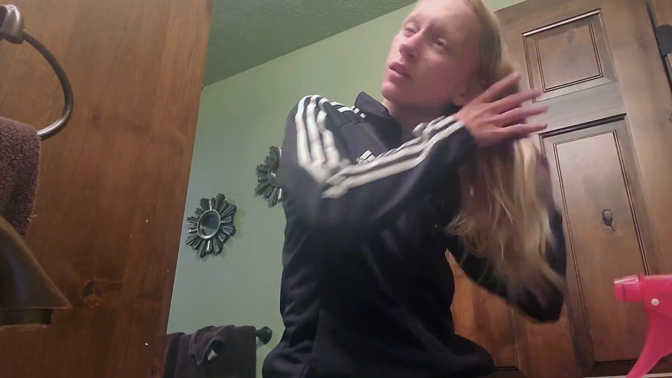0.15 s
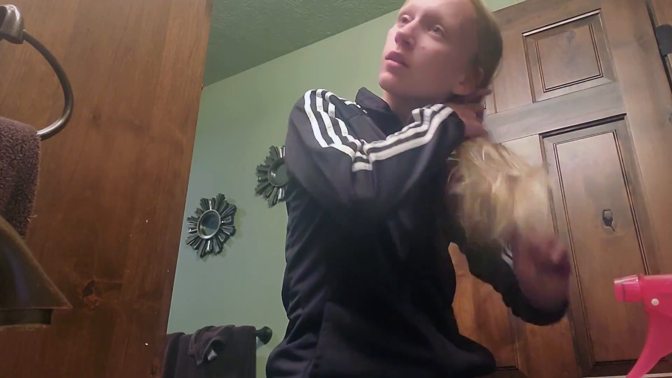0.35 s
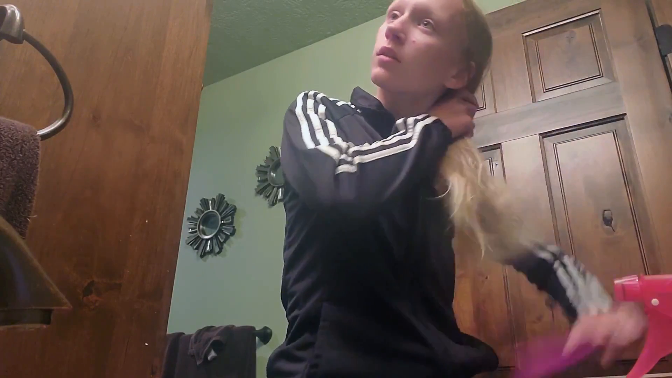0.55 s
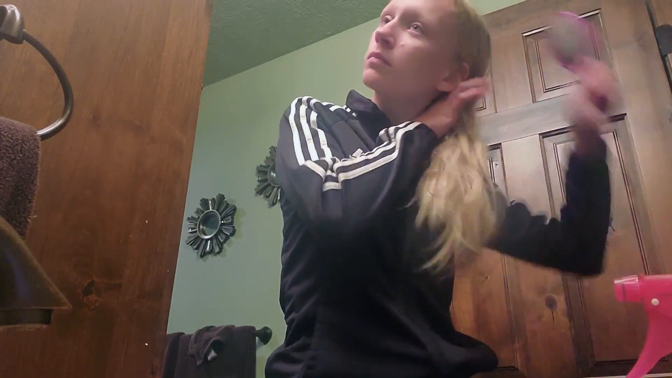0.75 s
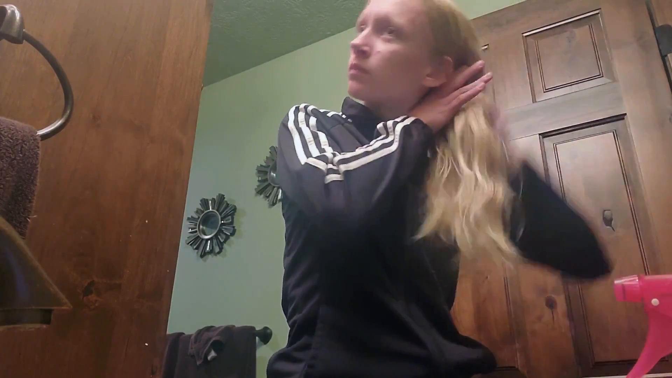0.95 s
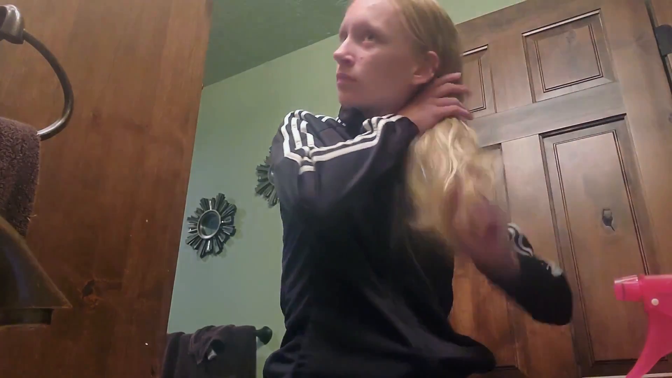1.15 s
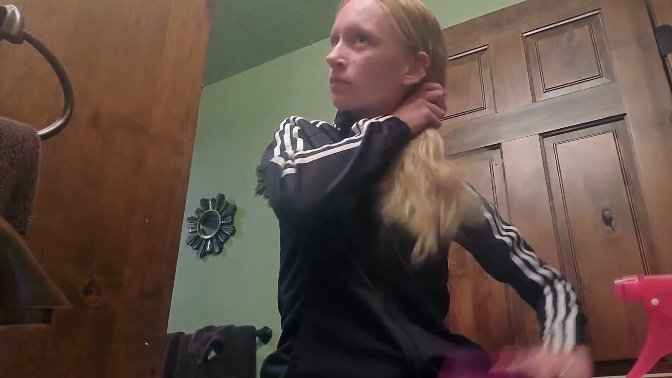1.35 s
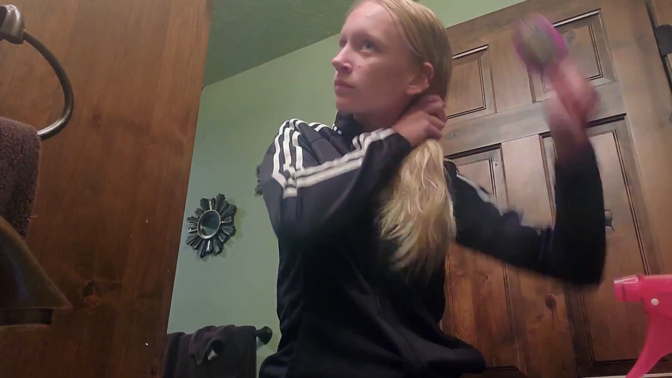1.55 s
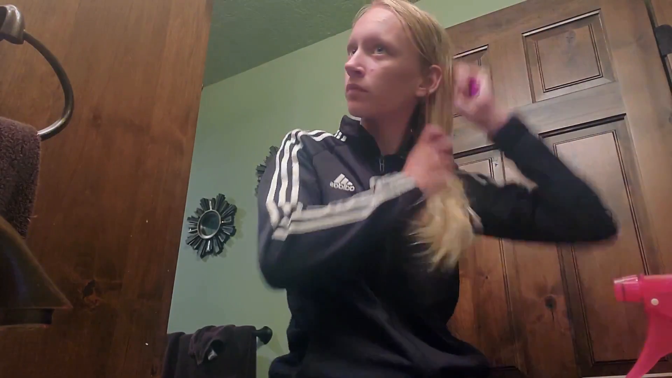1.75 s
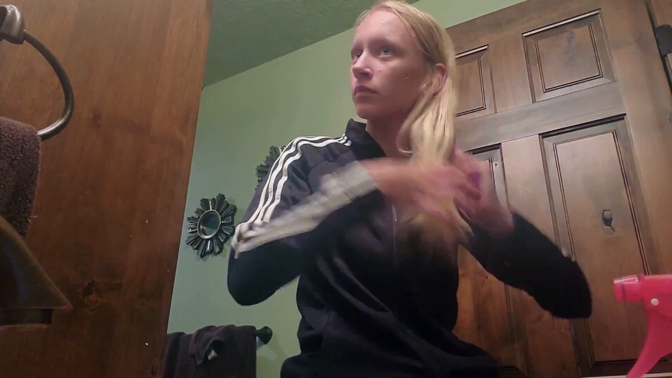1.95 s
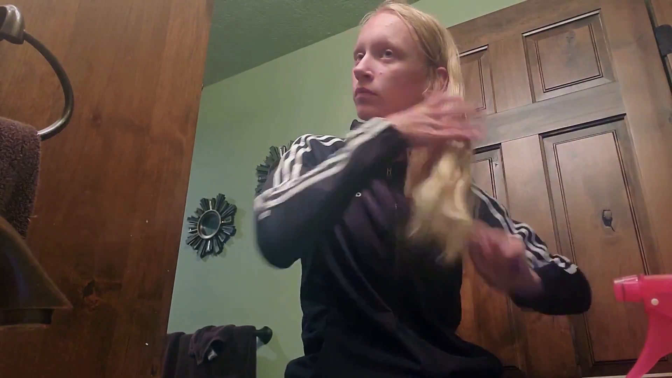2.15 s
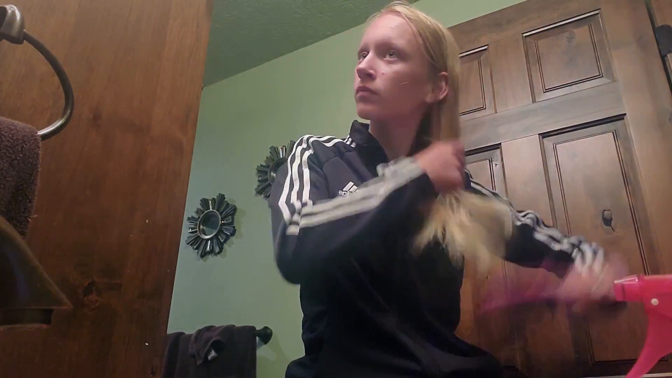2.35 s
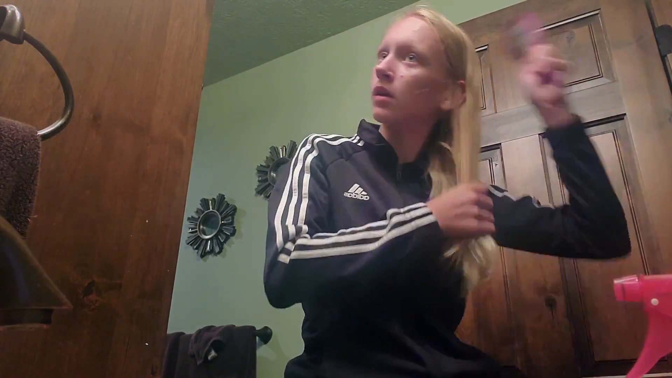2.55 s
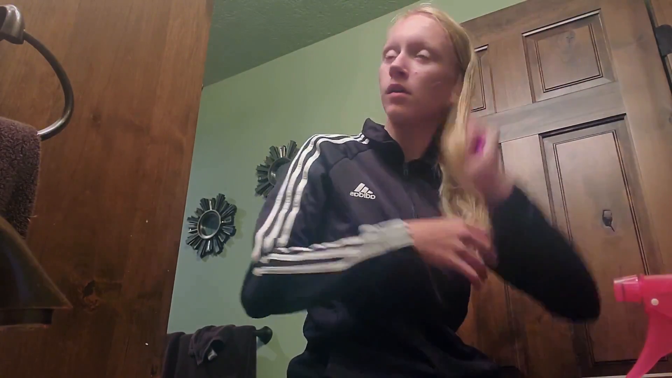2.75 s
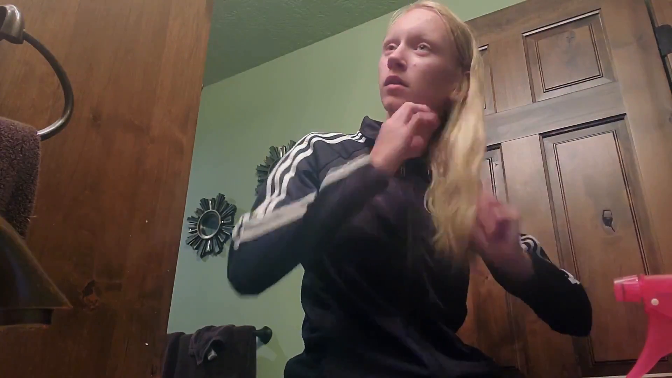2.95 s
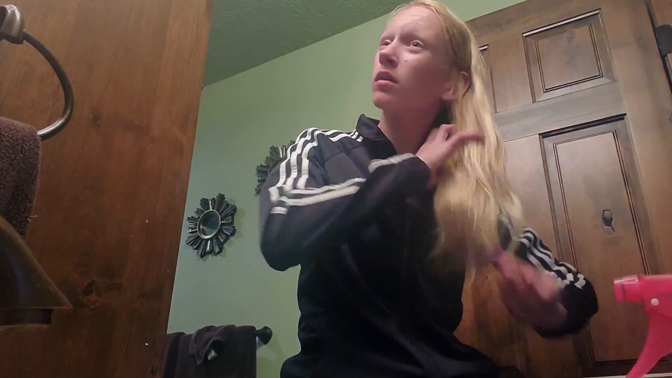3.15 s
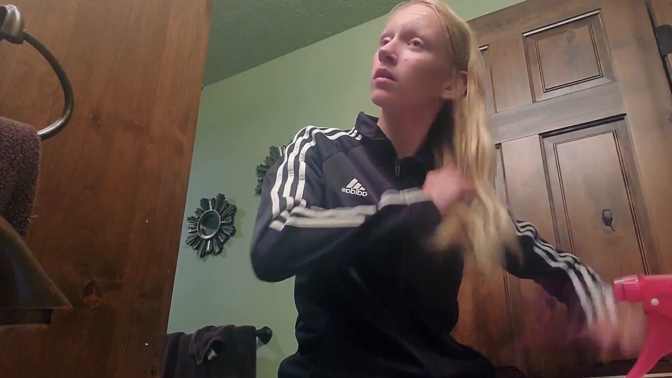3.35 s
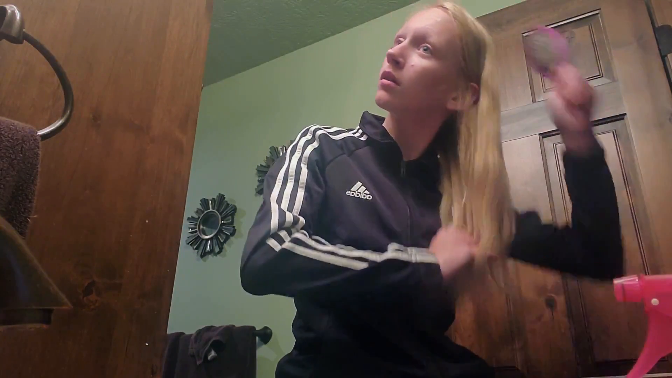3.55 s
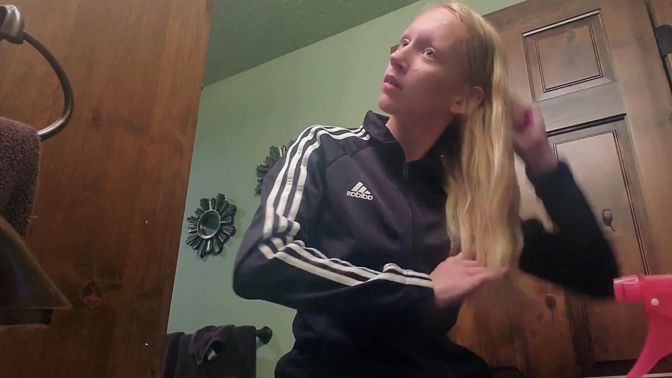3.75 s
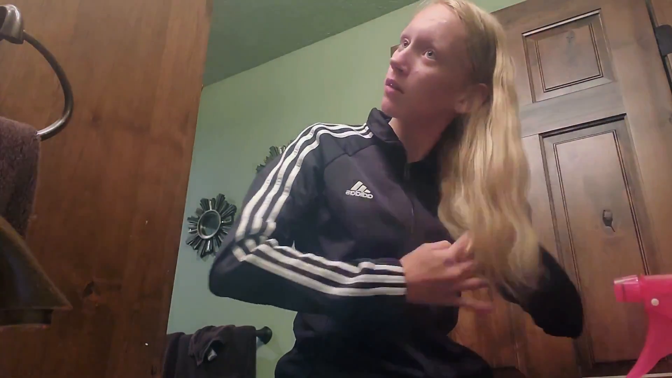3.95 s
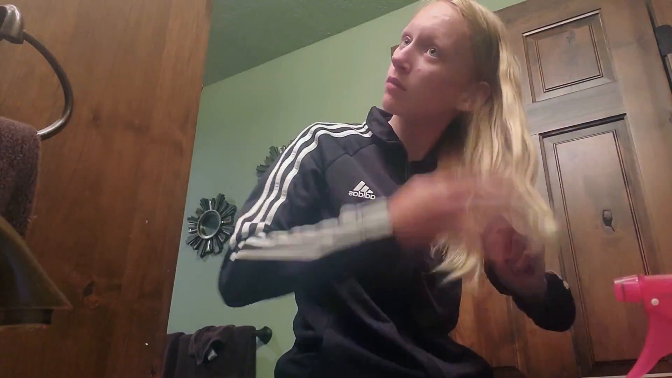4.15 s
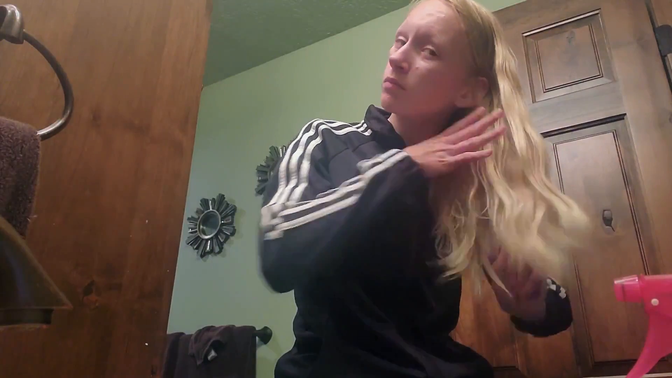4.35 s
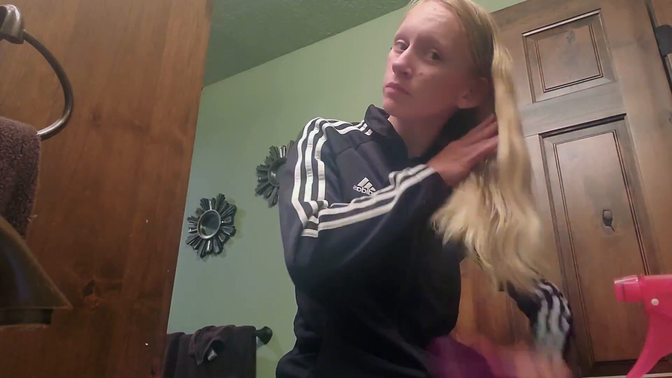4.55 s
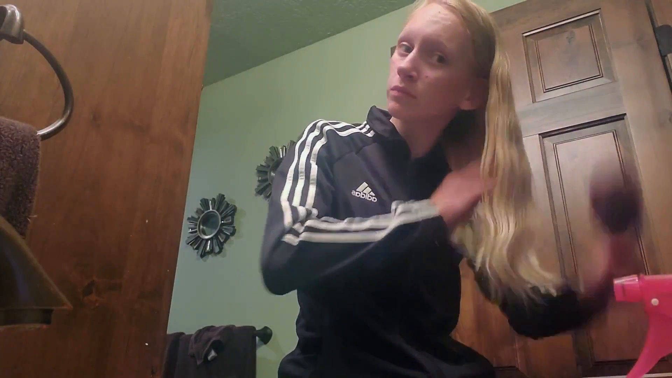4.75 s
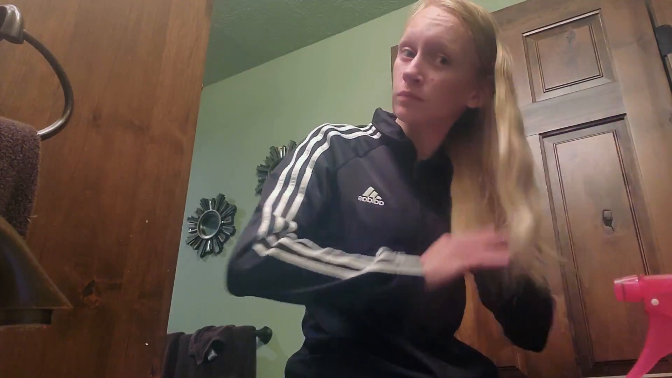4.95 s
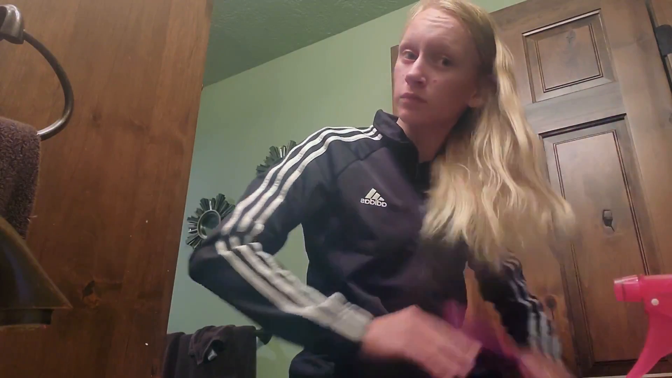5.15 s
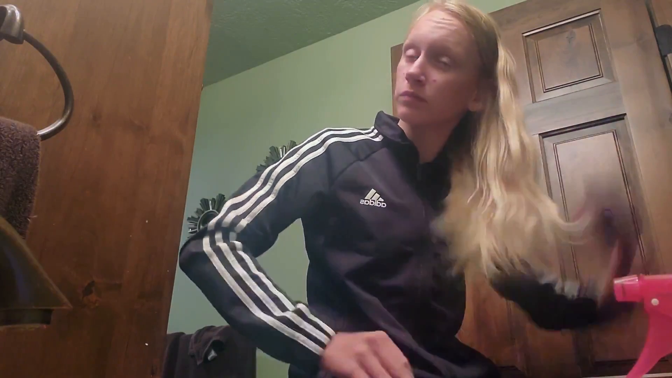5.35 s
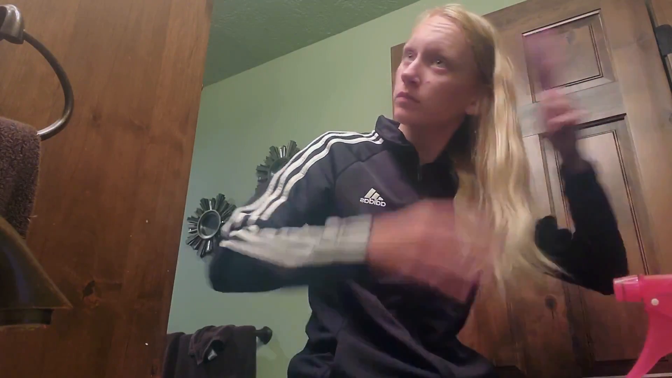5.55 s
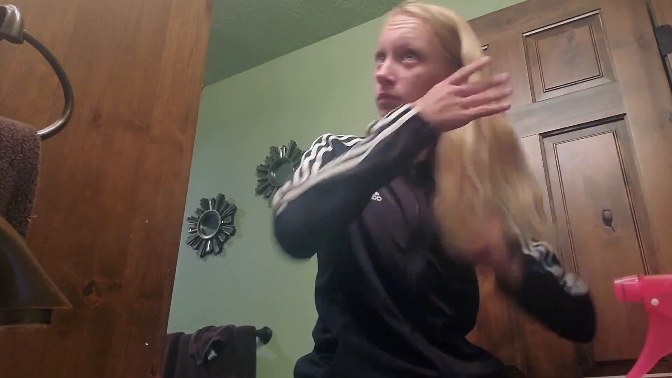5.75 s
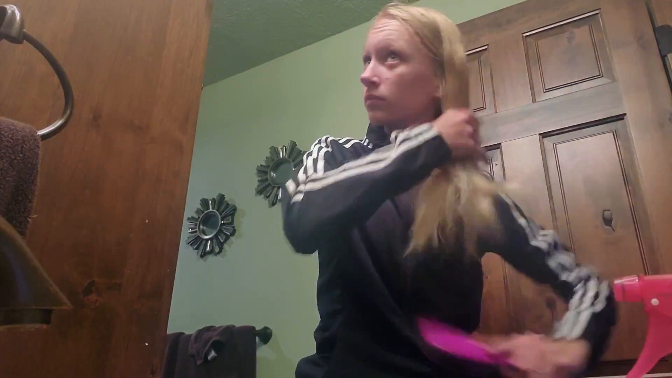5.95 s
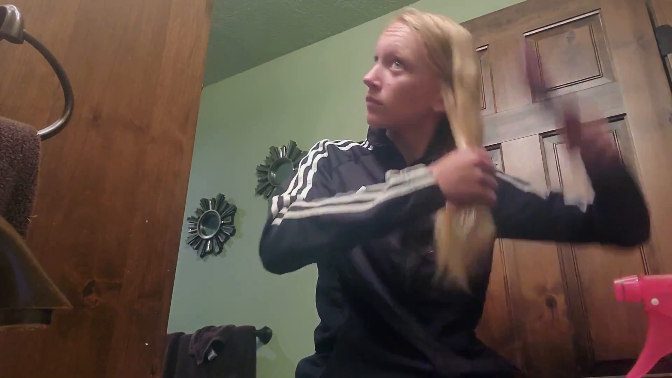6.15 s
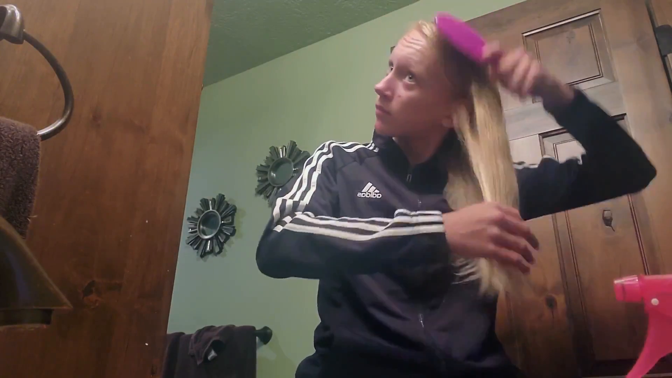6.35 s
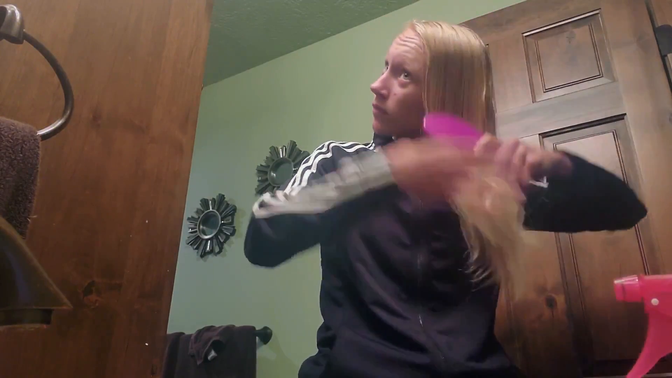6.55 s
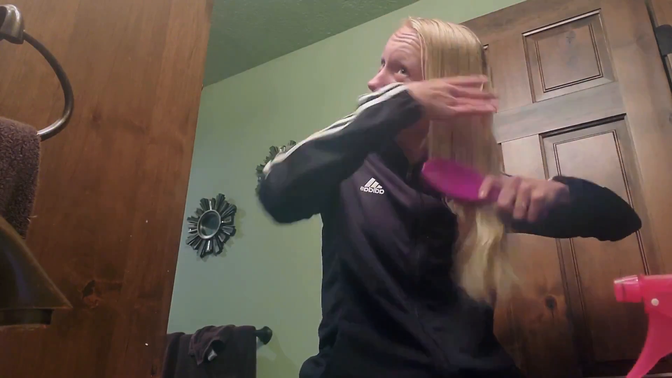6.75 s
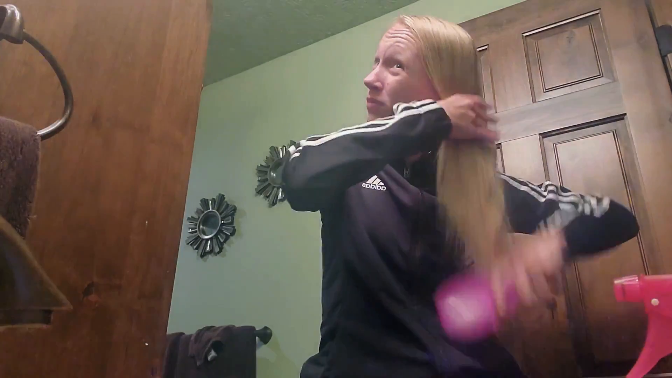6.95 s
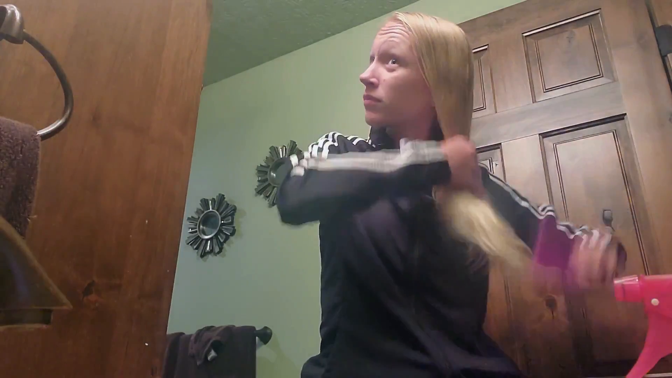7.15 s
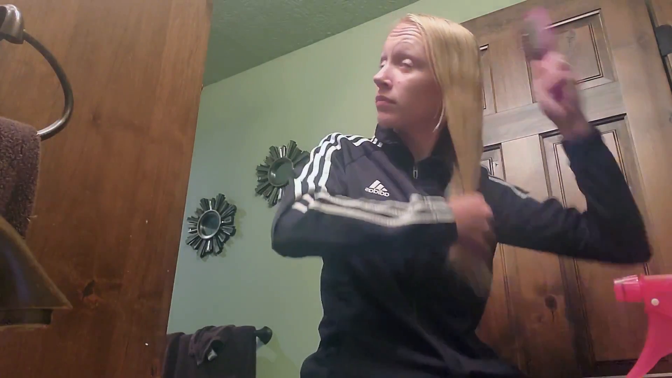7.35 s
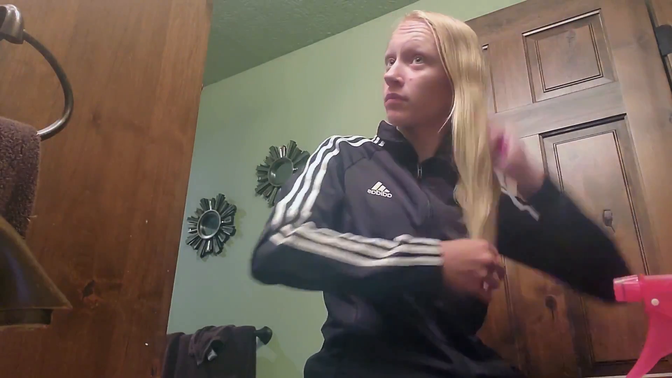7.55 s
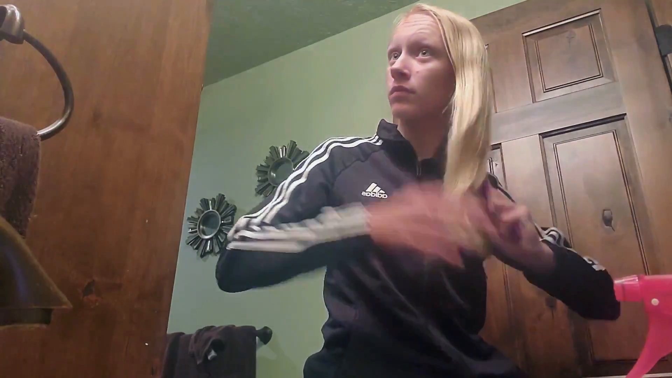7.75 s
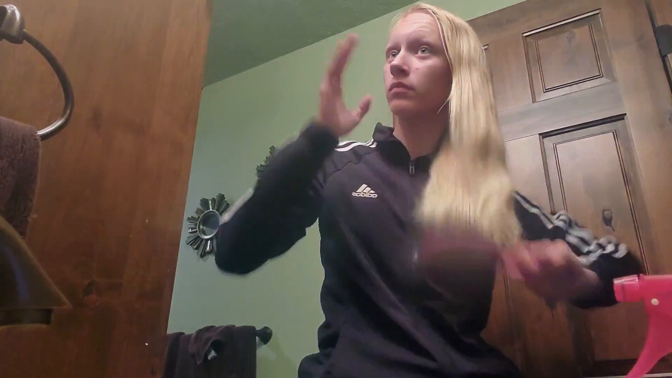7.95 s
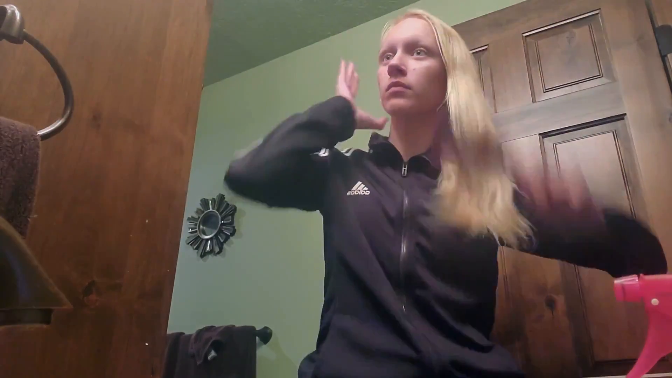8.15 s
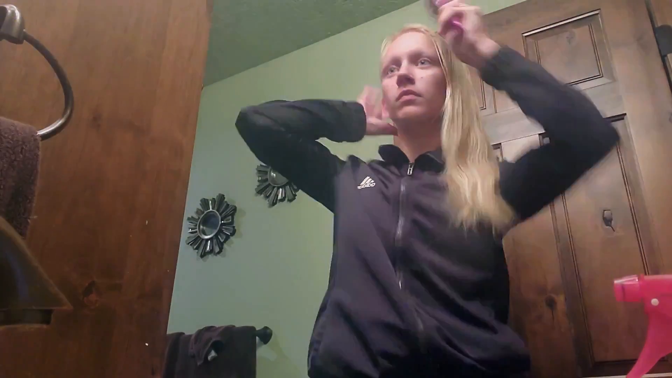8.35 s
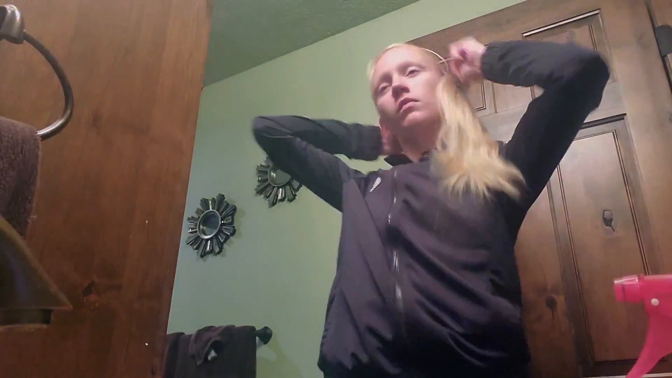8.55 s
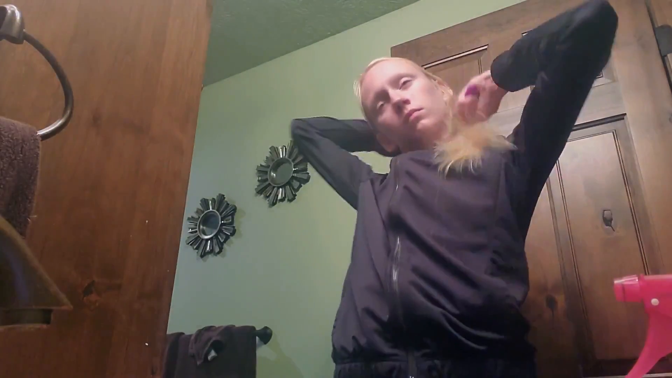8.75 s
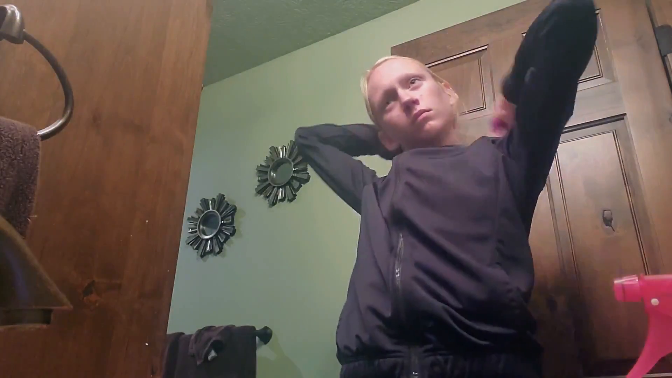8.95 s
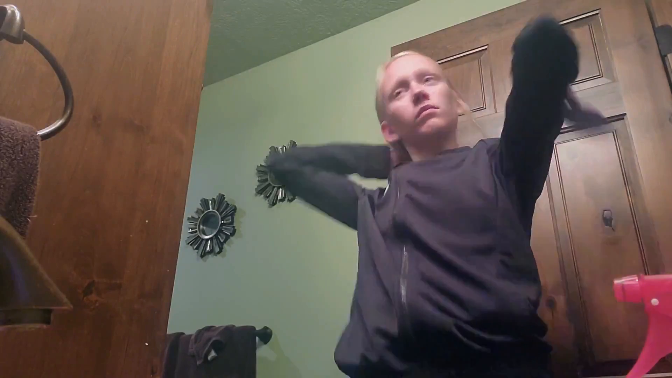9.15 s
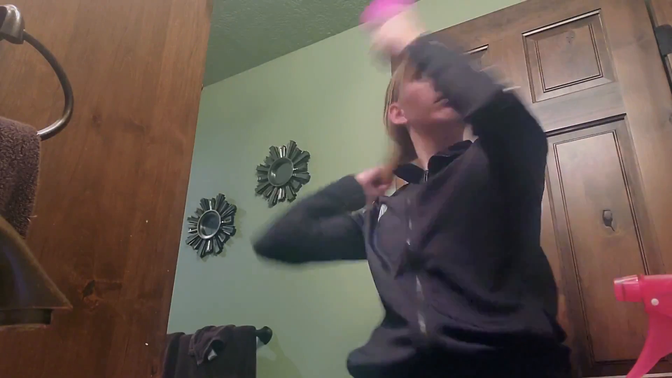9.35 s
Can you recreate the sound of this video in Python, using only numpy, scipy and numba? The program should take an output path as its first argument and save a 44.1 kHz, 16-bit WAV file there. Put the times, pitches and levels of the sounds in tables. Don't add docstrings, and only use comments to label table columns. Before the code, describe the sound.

Close brushing of long hair: scratchy, hollow strokes with crisp tangle snaps and soft landing knocks, over very faint room hum.

```python
import sys
import numpy as np
from scipy import signal
from scipy.fft import rfft, irfft
from scipy.io import wavfile
from scipy.ndimage import uniform_filter1d
from numba import njit

SR = 44100
rng = np.random.default_rng(int(sys.argv[2]) if len(sys.argv) > 2 else 0)


def wav_out(sig):
    wavfile.write(sys.argv[1], SR, np.round(np.clip(np.atleast_2d(sig).T, -1, 1) * 32767).astype(np.int16))


def attenuation_scalar(level_db):
    decades = np.asarray(level_db, float) / 20
    return 10 ** decades


N = 414540


def unit(x):
    return x / np.sqrt(np.mean(x ** 2))


def ring(x, modes):
    out = 0
    for k, (hz, width, db) in enumerate(modes):
        mode = signal.lfilter(*signal.iirpeak(hz, hz / width, SR), x)
        out = out + (-1) ** k * attenuation_scalar(db) * mode
    return out


def colour(x, points):
    hz, db = np.transpose(points)
    size = 4096
    bins_hz = np.arange(size // 2 + 1) * SR / size
    curve_db = np.interp(np.log(bins_hz + 1), np.log(hz), db)
    ceps = irfft(np.log(attenuation_scalar(curve_db)))
    ceps[1:size // 2] *= 2
    ceps[size // 2 + 1:] = 0
    return signal.fftconvolve(x, irfft(np.exp(rfft(ceps))))[:len(x)]


def walk(rate):
    hold = int(SR / rate)
    return uniform_filter1d(np.repeat(rng.standard_normal(N // 20), hold)[:N], hold)


def add(out, s, sound):
    i = int(s * SR)
    out[i:i + len(sound)] += sound[:N - i]


def slips(per_s, spread_db, patchy_db, patch_rate):
    when, size, sign = rng.random(N), rng.exponential(size=N), rng.standard_normal(N)
    share = np.clip((per_s / SR - when) * SR / (0.22 * per_s), 0, 1)
    size_db = spread_db * np.minimum(size, 5) + patchy_db * walk(patch_rate)
    return unit(share * sign * attenuation_scalar(size_db))


@njit
def glide(x, hz, width):
    y, band, low = np.empty(len(x)), 0., 0.
    for i in range(len(x)):
        g, k = np.tan(np.pi * hz[i] / SR), width / hz[i]
        v = (band + g * (x[i] - low)) / (1 + g * (g + k))
        band, low, y[i] = 2 * v - band, low + 2 * g * v, k * v
    return y


BITE_S, LET_GO_DB_PER_S, HISS_BITE_S, HISS_LET_GO_DB_PER_S = 0.0048, 279, 0.038, 330
SETTLE_DB, SETTLE_DB_PER_S = -26.5, 88.5
HANDLE_DB, HANDLE_PER_HISS = -2.5, 0.63
CUSHION_REST_HZ, CUSHION_PRESSED_HZ, PRESS_S, WANDER_HZ = 578, 690, 0.035, 40.3
SWISH_DB_PER_S = 111.5
# start in seconds, end in seconds, start level in dB, end level in dB, strand hiss in dB over cushion.
PULLS = [(-0.1, 0.063, -33.5, -58.5, -6), (0.067, 0.26, -64, -45, -10), (0.213, 0.343, -44.5, -43.5, -8.5),
         (0.328, 0.505, -38, -37.5, -5), (0.98, 1.064, -60, -52.5, -6), (1.069, 1.313, -50.5, -31, -5.5),
         (1.79, 1.99, -53, -46, -7.5), (1.978, 2.265, -49.5, -34.5, -5.5), (2.724, 3.014, -53.5, -47, -5.5),
         (3.021, 3.307, -42, -39, -2.5), (3.768, 4.211, -55.5, -45, -6.5), (4.223, 4.324, -54, -52.5, -5.5),
         (4.312, 4.569, -53.5, -36.5, -8), (5.057, 5.184, -57.5, -38, -4.5),
         (5.626, 5.834, -65.5, -57.5, -1), (5.815, 5.915, -43.5, -42, -8.5), (6.391, 6.536, -75.5, -57, -2),
         (6.51, 6.97, -65.5, -57.5, 3), (6.926, 7.012, -55.5, -37.5, -8.5),
         (7.536, 7.89, -51.5, -46, -10.5), (7.895, 8.012, -37.5, -35, -8),
         (8.498, 8.733, -70.5, -48.5, -0.5), (8.72, 8.903, -49.5, -59.5, -1),
         (8.896, 9.077, -57, -43.5, -7.5)]
# peak time in seconds, cushion level in dB, strand hiss in dB.
SWISHES = [(0.9, -72, -90), (1.576, -75.5, -84), (1.72, -82, -63.5), (2.6, -66, -83), (2.7, -64.5, -85),
           (3.72, -86, -92), (4.781, -67.5, -82), (4.98, -71, -70), (5.5, -96, -85), (6.1, -96, -84.5),
           (6.234, -81, -80), (6.36, -88, -71), (7.344, -76, -85), (7.5, -82, -74.5), (8.25, -67, -76.5),
           (8.365, -85, -78), (8.46, -107, -77), (9.3, -92, -65.5)]


def effort():
    t, gains, pressed = np.arange(N) / SR, np.zeros((3, N)), np.zeros(N)
    last_end = -1
    for start, end, from_db, to_db, hiss_db in PULLS:
        start = next((s for s, *_ in LANDINGS if abs(s - start) < .045), start)
        since, after = np.clip(t - start, 0, None), np.clip(t - end, 0, None)
        db = np.interp(t, [start, end], [from_db, to_db])
        bite = HISS_BITE_S if start - last_end > .04 else BITE_S
        fall = np.maximum(-HISS_LET_GO_DB_PER_S * after, SETTLE_DB - SETTLE_DB_PER_S * after)
        slide = np.minimum(since / bite, 1) * attenuation_scalar(db + fall)
        press = np.minimum(since / BITE_S, 1) * attenuation_scalar(db - LET_GO_DB_PER_S * after)
        buzz = slide * attenuation_scalar(HANDLE_DB + HANDLE_PER_HISS * hiss_db)
        gains = np.maximum(gains, [press, buzz, slide * attenuation_scalar(hiss_db)])
        pressed[(t > start) & (t < end + .02)] = 1
        last_end = end
    for s, db, hiss_db in SWISHES:
        peaks_db = np.array([[db], [hiss_db - 14.5], [hiss_db]])
        gains += attenuation_scalar(peaks_db - SWISH_DB_PER_S * np.abs(t - s))
    step = 1 / (PRESS_S * SR)
    pressed = signal.lfilter([step], [1, step - 1], pressed)
    hz = CUSHION_REST_HZ + (CUSHION_PRESSED_HZ - CUSHION_REST_HZ) * pressed + WANDER_HZ * walk(6)
    return *gains, hz


THUD_DB = -15.5
# multiple of the cushion pitch, width in Hz, level in dB.
CUSHION = [(.8, 87.3, -9.5), (.93, 73.4, -3.5), (1.06, 85.7, -1.5), (1.25, 128, -3.5)]
# frequency in Hz, width in Hz, level in dB.
SHELL = [(265, 85, -10), (339, 87, -10), (419, 56, -6.5), (623.5, 77, -6.5), (1197, 163, -10.5)]
# frequency in Hz, width in Hz, level in dB.
HANDLE = [(1370, 416, -6.5), (2304, 358, 1.5), (2403, 327, 2.5), (3000, 360, -7), (3800, 750, -12.5)]
# frequency in Hz, level in dB per Hz.
STRANDS = [(1940, -2), (3300, -20), (4120, 0), (4720, 0), (6880, 2.5), (7710, -1), (9760, -5), (15400, -5),
           (16200, -31), (16500, -23)]
# frequency in Hz, width in Hz, level in dB.
ARM = [(58.3, 26, -2), (117, 29, -1), (157, 20, -11)]


def drag():
    press, buzz, slide, hz = effort()
    snag = attenuation_scalar(0.66 * walk(45))
    coarse = slips(per_s=1550, spread_db=1.95, patchy_db=0.6, patch_rate=70)
    fine = slips(per_s=12100, spread_db=1.9, patchy_db=-0.8, patch_rate=140)
    rare = slips(per_s=150, spread_db=0.5, patchy_db=4.5, patch_rate=50)
    air = sum((-1) ** k * attenuation_scalar(db) * glide(coarse, multiple * hz, 1. * width)
              for k, (multiple, width, db) in enumerate(CUSHION))
    cushion = attenuation_scalar(1) * unit(ring(air + ring(coarse, SHELL), [(560, 3060, 0)]))
    handle = attenuation_scalar(2.0) * unit(ring(0.38 * coarse + 0.67 * fine, HANDLE))
    hiss = attenuation_scalar(1.0) * unit(colour(fine + 0.15 * coarse + 0.15 * rare, STRANDS))
    arm = ring(rng.standard_normal(N), ARM)
    thud = attenuation_scalar(THUD_DB) * unit(ring(arm, [(97, 170, 0)]))
    return snag * (press * (cushion + thud) + buzz * handle + slide * hiss)


HOUSE_DB = -71.5
# frequency in Hz, level in dB per Hz.
HOUSE = [(15, -54), (25, 0), (65, 3.5), (187, -6), (238, -10.5), (339, -11.5), (651, -15.5), (1180, -23.5),
         (1780, -27), (2600, -24.5), (3510, -24), (6040, -16), (10400, -27.5), (15200, -32.5), (16500, -61)]
# frequency in Hz, level in dB rms.
HUM = [(59.5, -76.5), (242, -84)]


def house():
    mid, side = (colour(rng.standard_normal(N) * attenuation_scalar(0.83 * walk(4.6)), HOUSE) for _ in range(2))
    side = signal.sosfilt(signal.butter(1, 700, "high", fs=SR, output="sos"), side)
    t = np.arange(N) / SR
    hum = sum(attenuation_scalar(db + 5.5 + 2.5 * walk(9)) * np.sin(2 * np.pi * hz * t) for hz, db in HUM)
    return attenuation_scalar(HOUSE_DB) / np.std(mid) * np.array([mid + side, mid - side]) + hum


SNAP_T60_S, SNAP_TAIL_DB, SNAP_TAIL_T60_S, SNAP_FROM_HZ = .009, -14.5, .08, 4500
PIN_DB = -12
# start in seconds, peak level in dB, pin pitch in Hz, handle level in dB.
SNAPS = [(0.333, -38, 8400, -26), (0.4, -22.5, 7200, -20), (0.4878, -18, 6340, -21),
         (1.2355, -22, 6040, -28.5), (1.3769, -21.5, 5260, -19.5), (2.0956, -31, 5960, -50.5),
         (2.1384, -30, 6150, -42.5), (2.2243, -21.5, 7600, -21.5), (2.5293, -31, 5950, -86),
         (2.589, -42.5, 5000, -50), (2.927, -34.5, 6400, -54.5), (3.017, -28, 6950, -42.5),
         (3.0354, -34, 6200, -44), (3.1055, -25.5, 7400, -26), (3.1235, -25, 7330, -50),
         (3.2757, -19, 6570, -17), (4.1834, -30, 6450, -48), (4.3542, -34.5, 8640, -34),
         (4.4287, -25, 6700, -31), (4.4492, -22, 6720, -25), (4.4686, -24.5, 5600, -26),
         (4.5671, -24.5, 6430, -21), (5.1441, -23.5, 7400, -47), (5.163, -25.5, 8000, -26),
         (5.8335, -25, 6770, -47), (5.887, -24.5, 7000, -30.5), (7.785, -26.5, 6640, -53),
         (7.984, -28, 6450, -23.5), (8.0177, -21.5, 6440, -17.5), (8.7027, -24, 6000, -44)]


def snaps():
    out, jolts, t = np.zeros(N), np.zeros(N), np.arange(SR // 8) / SR
    sprays = rng.standard_normal((len(SNAPS), len(t)))
    fade = attenuation_scalar(-60 * t / SNAP_T60_S) + attenuation_scalar(SNAP_TAIL_DB - 60 * t / SNAP_TAIL_T60_S)
    swell = t / 0.00026 * np.exp(1 - t / 0.00069)
    for (s, db, hz, handle_db), spray in zip(SNAPS, sprays):
        pin = attenuation_scalar(PIN_DB) * np.sin(2 * np.pi * hz * t) * swell
        strands = ring(spray * fade, [(hz, 3500, 4), (12000, 8000, -2)])
        add(out, s, attenuation_scalar(db - 3.5) * (pin + ring(strands, [(8400, 20000, 0.0051)])))
        add(jolts, s, attenuation_scalar(handle_db + 4.0) * spray * attenuation_scalar(-60 * t / 0.055))
    bright = signal.sosfilt(signal.butter(3, SNAP_FROM_HZ, "high", fs=SR, output="sos"), out)
    return bright + attenuation_scalar(2.5) * ring(jolts, HANDLE)


def knocks(rows, t60, thud_t60):
    out, t = np.zeros(N), np.arange(SR // 4) / SR
    rise = 1 - np.exp(-t / 0.0008)
    fade = rise * attenuation_scalar(-60 * (t / t60) ** 1.07)
    for (s, db, hz, thud_db, *_), (pair, low) in zip(rows, rng.random((len(rows), 2))):
        second_hz = hz * (1.1 + 0.267 * pair)
        tone = np.sin(2 * np.pi * hz * t) + .5 * np.sin(2 * np.pi * second_hz * t)
        thud = np.sin(2 * np.pi * (75 + 30 * low) * t) * attenuation_scalar(-60 * t / thud_t60)
        add(out, s, attenuation_scalar(db - 3.0) * fade * tone + attenuation_scalar(thud_db + 5.0) * thud)
    return out


# start in seconds, peak level in
# dB, cushion # pitch in Hz, thud level in dB.
TUGS = [(0.334, -21, 605, -42), (0.374, -22, 787, -37.5), (0.426, -17.5, 616, -47.5),
        (0.475, -15, 590, -57.5), (0.521, -18, 626, -63), (1.139, -22, 735, -56.5), (1.29, -26, 625, -48),
        (1.324, -15.5, 632, -49), (2.035, -26.5, 588, -60), (5.823, -20.5, 856, -56),
        (8.895, -26.5, 700, -64), (2.224, -23, 614, -46.5), (3.013, -21, 846, -83), (3.135, -19, 762, -73),
        (3.252, -21, 690, -33), (3.28, -13, 680, -28.5), (4.208, -28.5, 620, -60), (4.403, -28, 640, -44),
        (4.46, -24, 603, -49), (4.533, -19, 610, -47), (4.568, -24.5, 696, -73), (5.179, -46, 743, -51),
        (6.989, -30, 418, -51), (7.042, -29, 630, -45), (7.776, -25, 641, -58), (7.895, -44, 645, -47),
        (7.93, -32, 620, -39), (7.967, -22.5, 645, -38), (8.942, -35, 700, -62), (8.982, -30, 680, -53)]


def tugs():
    return knocks(TUGS, t60=0.043, thud_t60=0.031)


RUB_WIDTH = 0.2
# centre in seconds, length in
# seconds, pitch in Hz, level in dB.
RUBS = [(0.55, 0.096, 296, -48.5), (1.563, 0.11, 430, -64.5), (8.729, 0.11, 1100, -42.5),
        (4.859, 0.72, 2380, -73.5), (2.643, 0.16, 1810, -66), (3.461, 0.1, 328, -64.5),
        (5.261, 0.025, 494, -46), (1.388, 0.015, 2650, -45), (1.388, 0.024, 5070, -40),
        (2.595, 0.032, 5160, -52.5), (6.043, 0.01, 3940, -60), (6.236, .1, 790, -67.5),
        (6.47, 0.036, 616, -51.5), (6.51, 0.028, 860, -49.5), (7.098, 0.087, 324, -64),
        (7.348, .1, 677, -73.5), (8.104, 0.12, 330, -69), (8.352, 0.034, 730, -61)]


def rubs():
    out, t = np.zeros(N), np.arange(-SR // 5, SR // 5) / SR
    for (s, length, hz, db), noise in zip(RUBS, rng.standard_normal((len(RUBS), len(t)))):
        swell = np.exp(-(2 * t / length) ** 2)
        add(out, s + t[0], attenuation_scalar(db) * swell * unit(ring(noise, [(hz, RUB_WIDTH * hz, 0)])))
    return out


PLATE_HZ, PLATE_T60_S = 1050, 0.058
# start in seconds, peak level in dB, cushion pitch in Hz, thud level in dB, back-plate ring in dB.
LANDINGS = [
    (0.973, -50, 533, -62, -50),
    (1.782, -35, 564, -53, -32.5),
    (2.733, -29.5, 534, -52.5, -44),
    (3.771, -42, 586, -61.5, -33.5),
    (5.045, -61, 650, -54, -66),
    (5.099, -36, 720, -50, -46),
    (5.657, -53.5, 690, -60, -46),
    (6.401, -46.5, 671, -43.5, -52),
    (7.548, -41, 581, -62, -33),
    (8.55, -49, 680, -74, -43),
]


def landings():
    plate, t = np.zeros(N), np.arange(SR // 8) / SR
    rise = 1 - np.exp(-t / 0.00098)
    for s, *_, db in LANDINGS:
        add(plate, s, attenuation_scalar(db - 60 * t / PLATE_T60_S) * rise * np.sin(2 * np.pi * PLATE_HZ * t))
    return knocks(LANDINGS, t60=0.11, thud_t60=0.17) + plate


PORT_LAG_S = 0.0004044


def two_ports(arrivals, gains, sides):
    response = np.zeros((2, SR // 2))
    for port, lag in enumerate((sides, -sides)):
        at = np.round((arrivals + (1 + lag) * PORT_LAG_S / 2) * SR).astype(int)
        np.add.at(response[port], at, gains)
    return response


def split(x):
    return [signal.sosfilt(signal.butter(4, 1500, kind, fs=SR, output="sos"), x) for kind in ("low", "high")]


def energy_one(response, share):
    return response * np.sqrt(share / np.sum(response ** 2, axis=1, keepdims=True))


WALL_T60_S, WALL_DB = 0.22, -5
WALL_TREBLE_T60_S, WALL_TREBLE_DB = .17, -9
SCATTER_S = .0004


def walls():
    chance = rng.random((3, 3000))
    echo = two_ports(.004 + .4 * chance[0], chance[1] - .5, np.sin(2 * np.pi * chance[2]))
    t = np.arange(echo.shape[1]) / SR
    low, high = split(echo)
    echo = attenuation_scalar(WALL_DB) * energy_one(low * attenuation_scalar(-60 * t / WALL_T60_S), 1 / 15)
    echo += attenuation_scalar(WALL_TREBLE_DB) * energy_one(high * attenuation_scalar(-60 * t / WALL_TREBLE_T60_S), 1)
    near = rng.random((3, 14))
    sides = np.sin(np.pi * np.clip(1.6 * near[2] - .7, -.5, .5))
    scatter = two_ports(-SCATTER_S * np.log(1 - .95 * near[0]), np.sign(near[1] - .5), sides)
    tones = rfft(scatter[:, :96])
    scatter[:, :96] = irfft(tones / (np.abs(tones) + 1e-9))
    direct = two_ports(np.zeros(1), 0.74, np.ones(1))
    return echo + split(direct)[0] + split(scatter)[1]


def bathroom(x, count=10, dwell_s=.015):
    hop = int(dwell_s * SR)
    place = np.repeat(rng.integers(0, count, N // 100), hop)[:N]
    out = 0
    for k in range(count):
        presence = uniform_filter1d(1. * (place == k), hop).clip(0)
        out = out + signal.fftconvolve([x * np.sqrt(presence)], walls(), axes=1)[:, :N]
    return out


def scene():
    brush = drag() + snaps() + tugs() + rubs() + landings()
    return bathroom(brush) + house()


def band_limit(x):
    return signal.sosfilt(signal.butter(12, 16990, fs=SR, output="sos"), x)


def record(dry):
    stereo_from_hz, bass_side_db, left_db, top_hz = 1050, -14, 2, 15900
    mid, side = (dry[0] + dry[1]) / 2, (dry[0] - dry[1]) / 2
    high = signal.sosfiltfilt(signal.butter(2, stereo_from_hz, "high", fs=SR, output="sos"), side)
    side = high + attenuation_scalar(bass_side_db) * (side - high)
    pair = np.array([mid + side, mid - side]) * attenuation_scalar(np.array([[left_db], [-left_db]]) / 2)
    pair = signal.sosfilt(signal.butter(3, 40, "high", fs=SR, output="sos"), pair)
    pair = signal.sosfilt(signal.ellip(8, .2, 60, top_hz, fs=SR, output="sos"), pair)
    return band_limit(pair)


dry = scene()
out = record(dry)
wav_out(out)
```